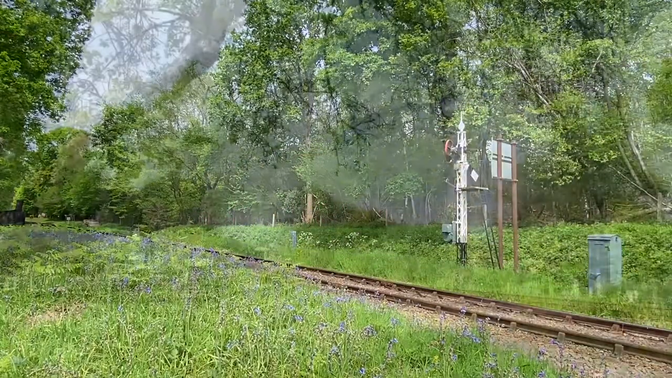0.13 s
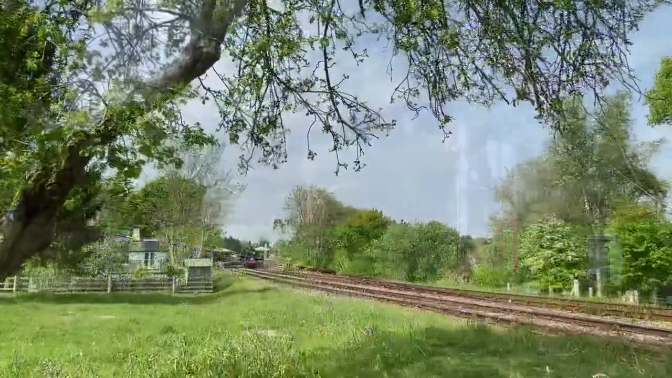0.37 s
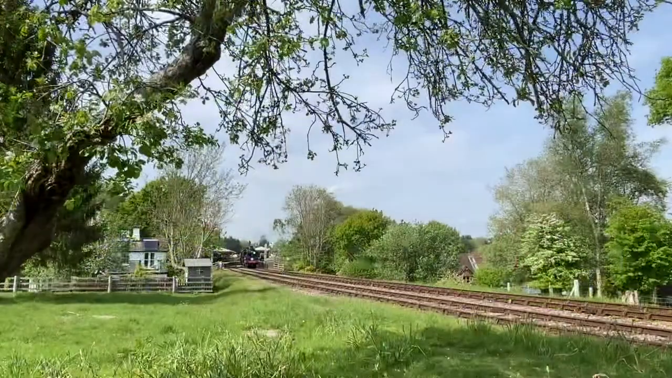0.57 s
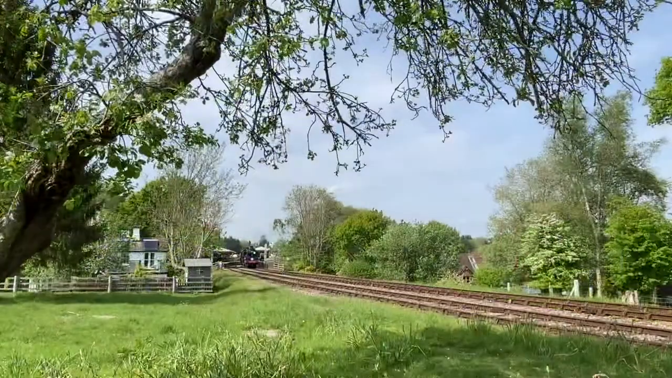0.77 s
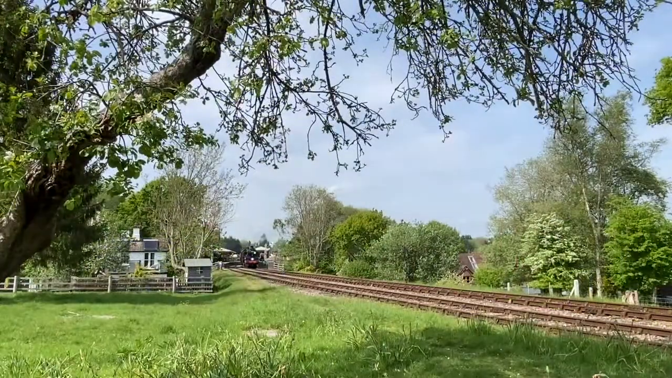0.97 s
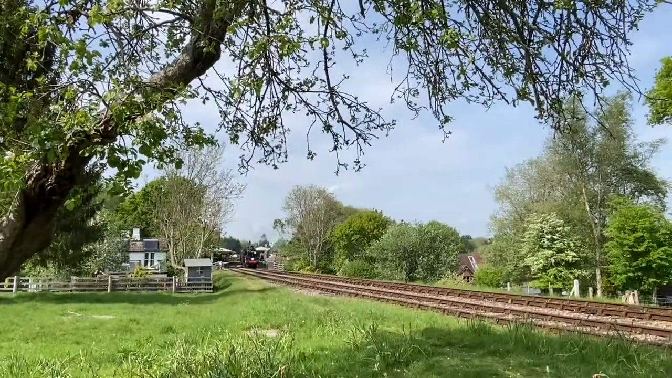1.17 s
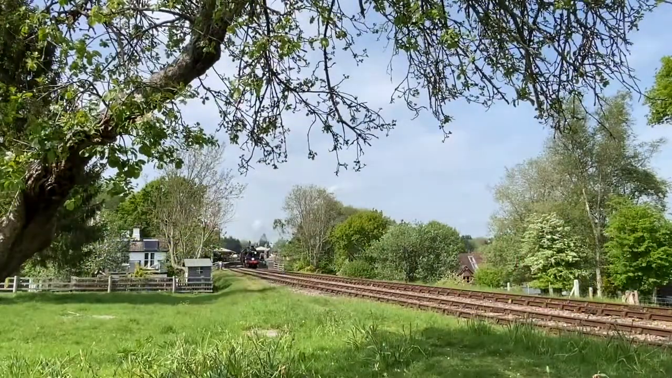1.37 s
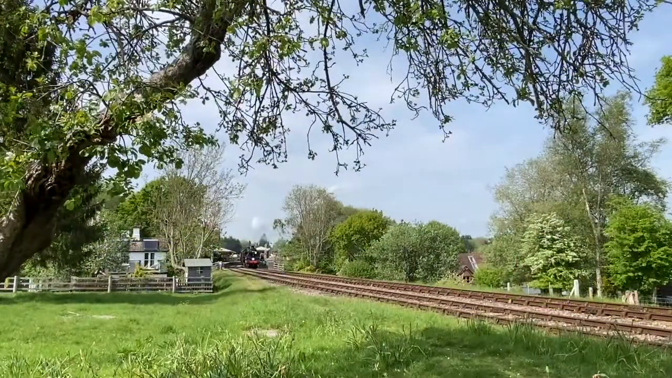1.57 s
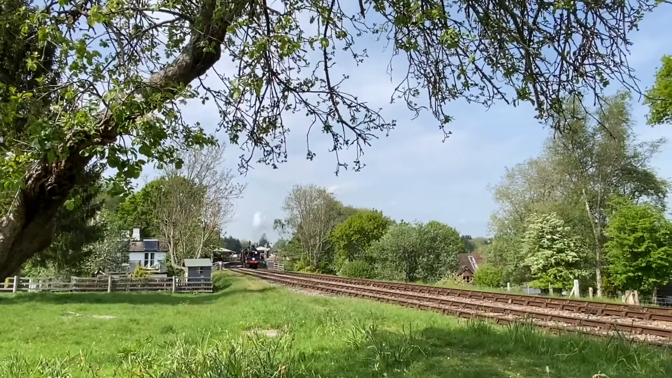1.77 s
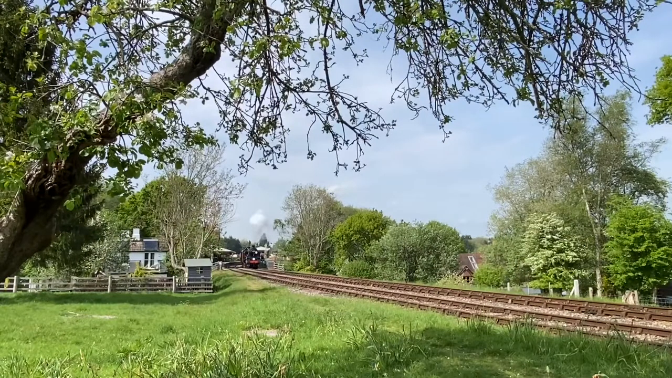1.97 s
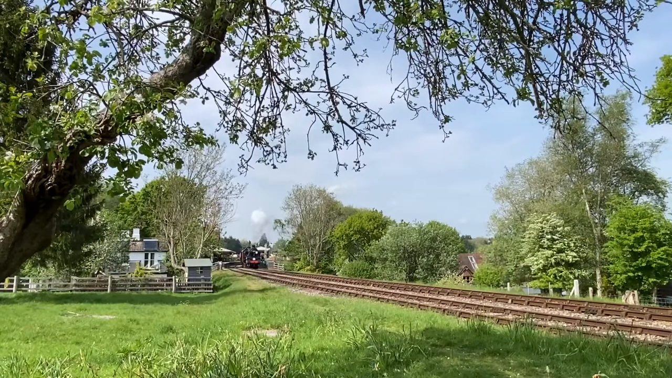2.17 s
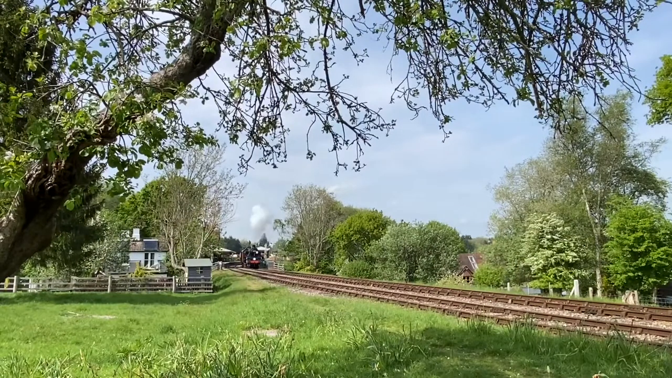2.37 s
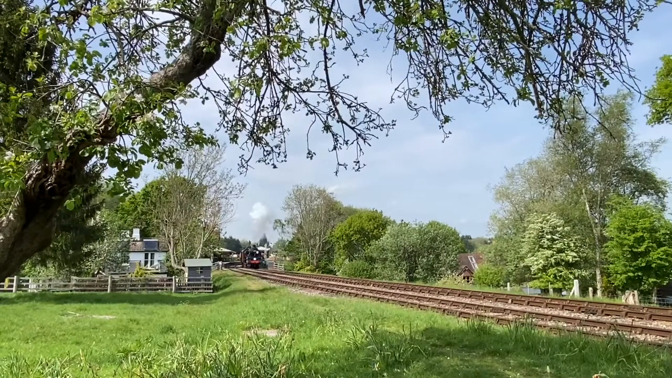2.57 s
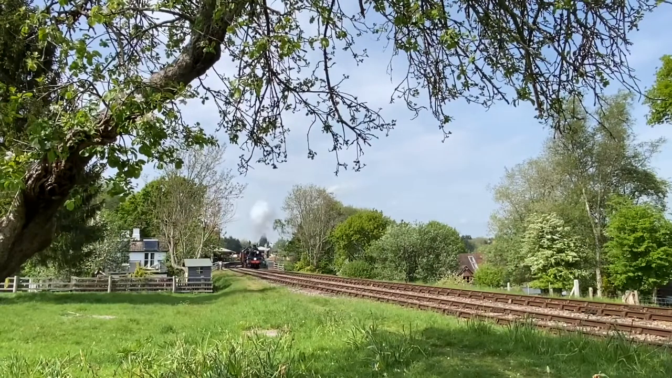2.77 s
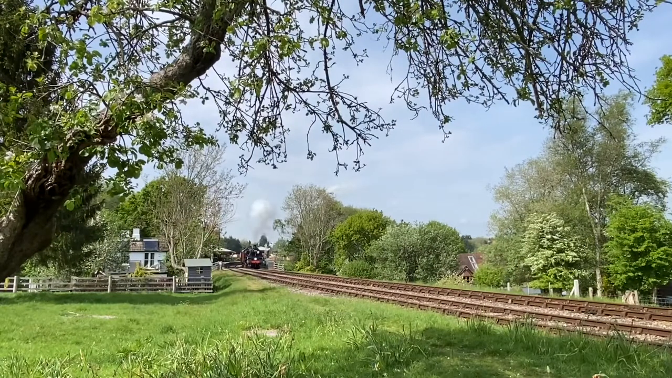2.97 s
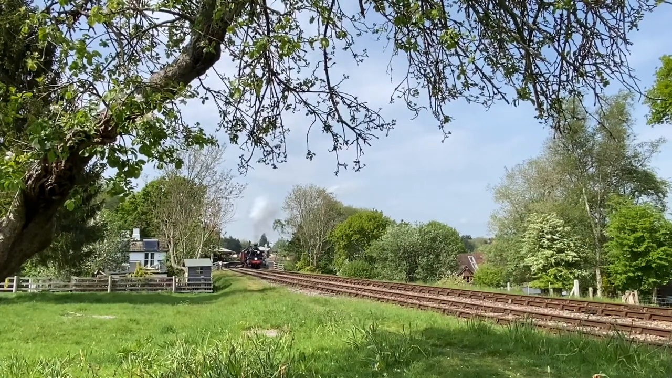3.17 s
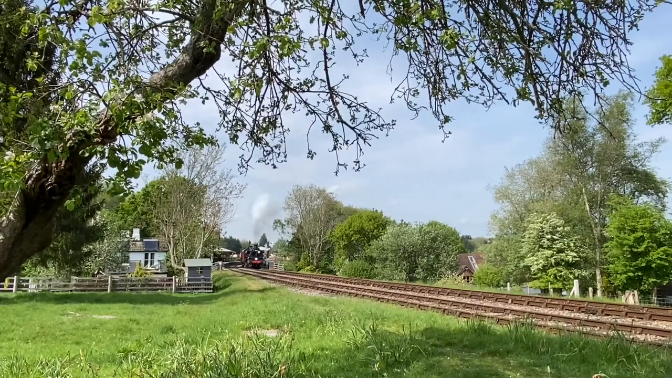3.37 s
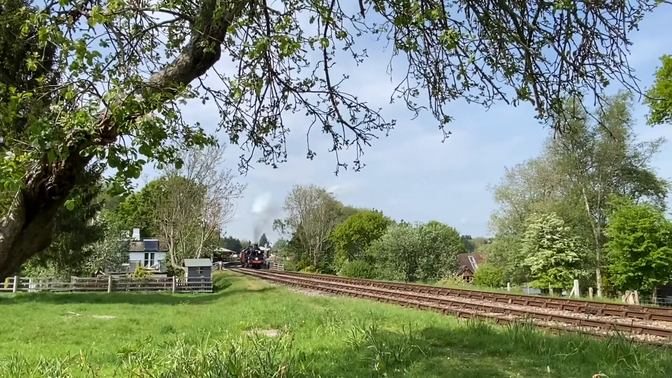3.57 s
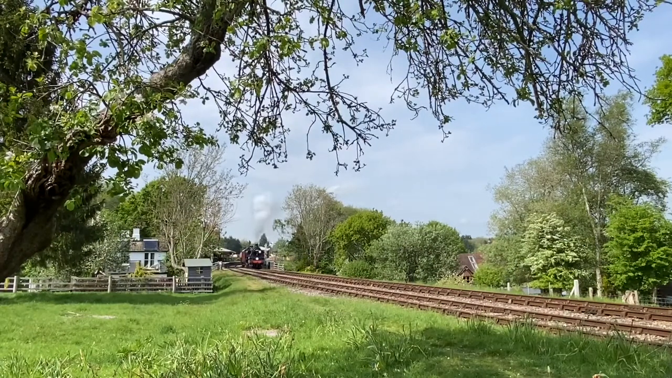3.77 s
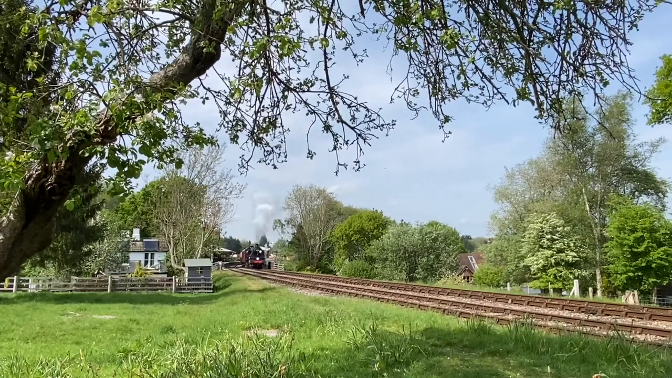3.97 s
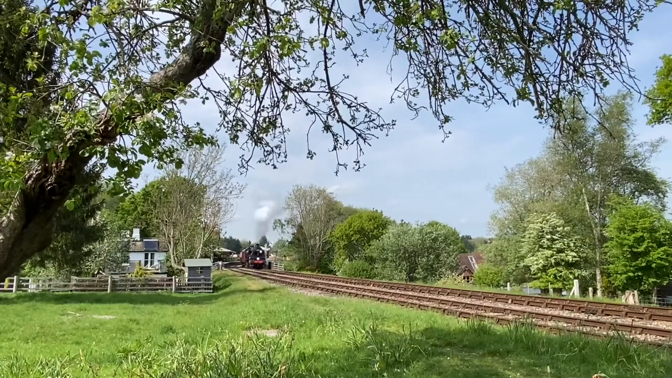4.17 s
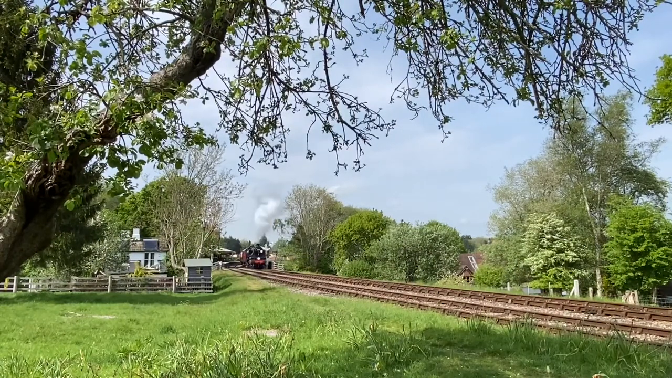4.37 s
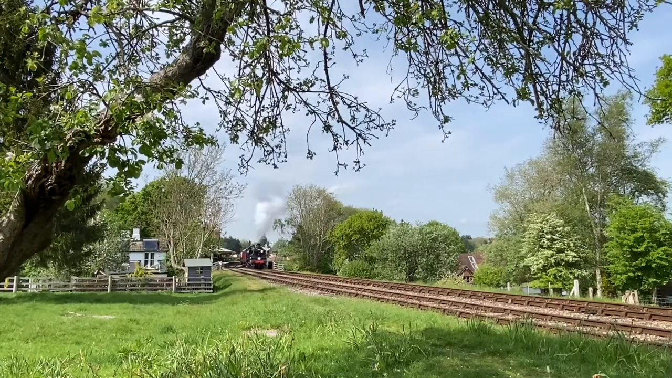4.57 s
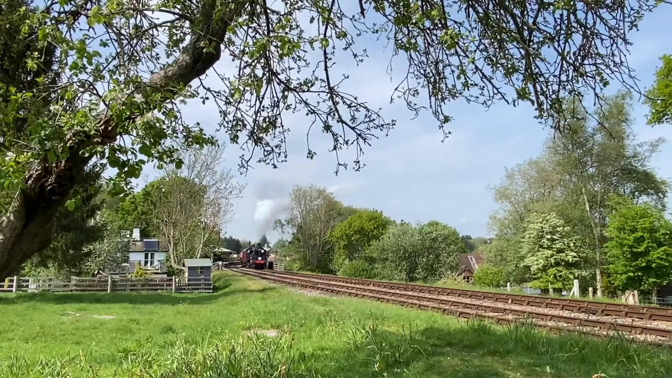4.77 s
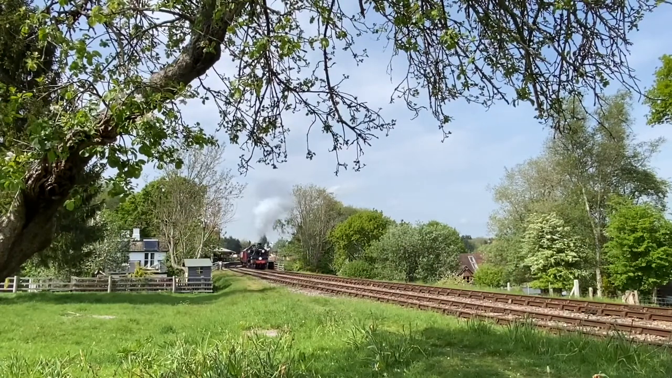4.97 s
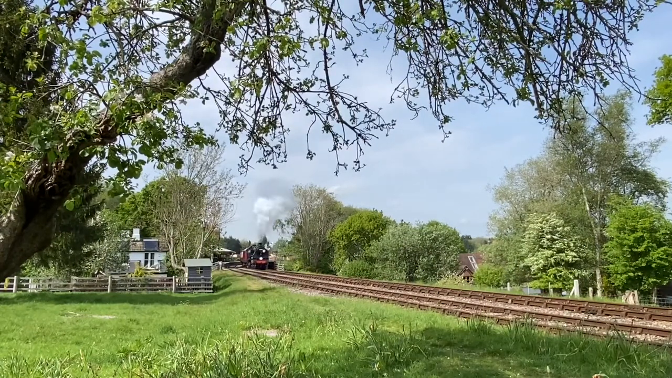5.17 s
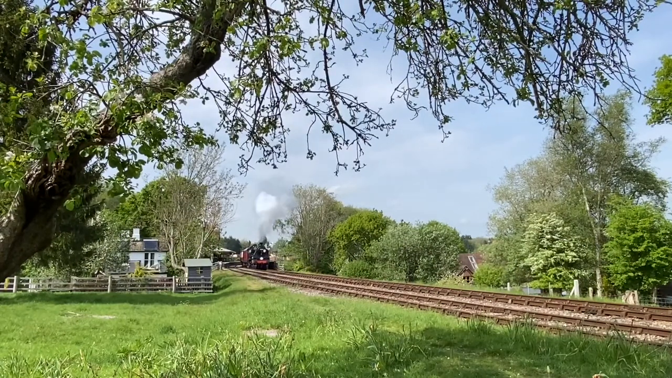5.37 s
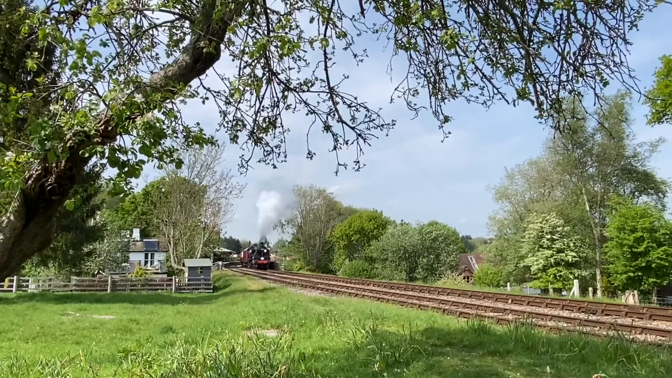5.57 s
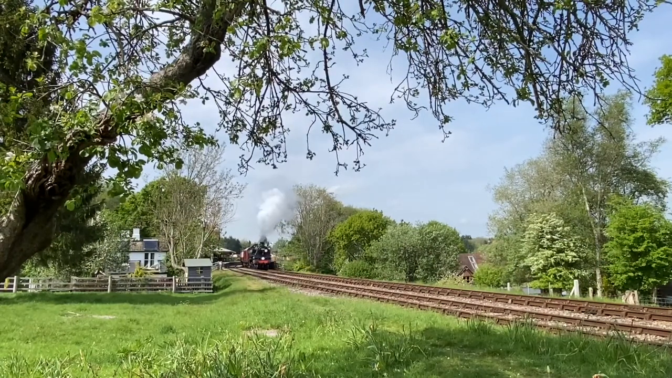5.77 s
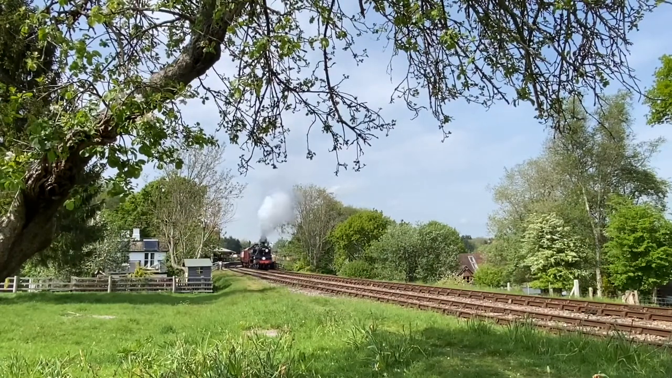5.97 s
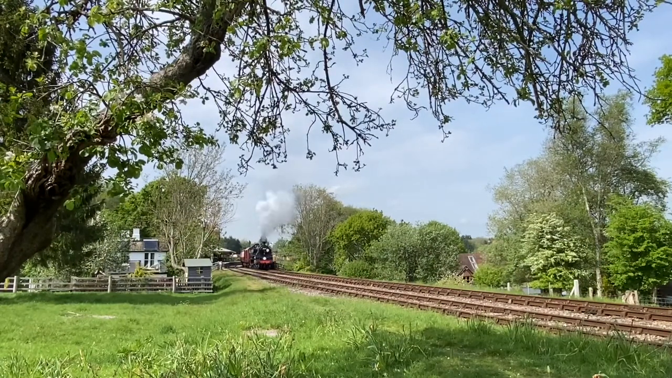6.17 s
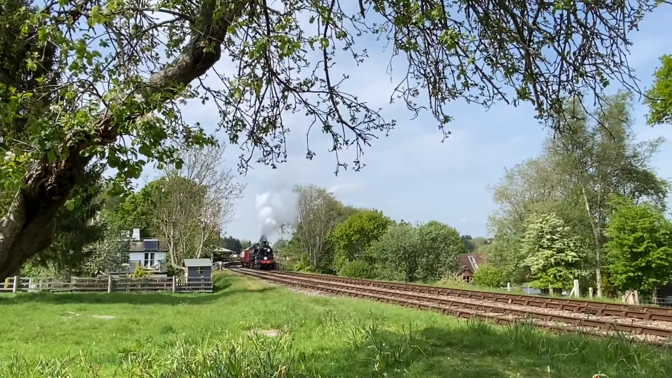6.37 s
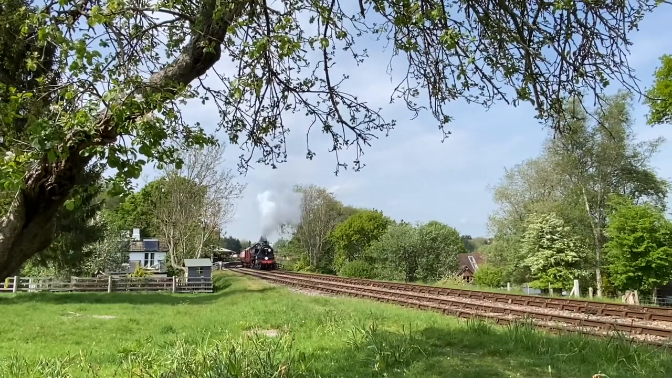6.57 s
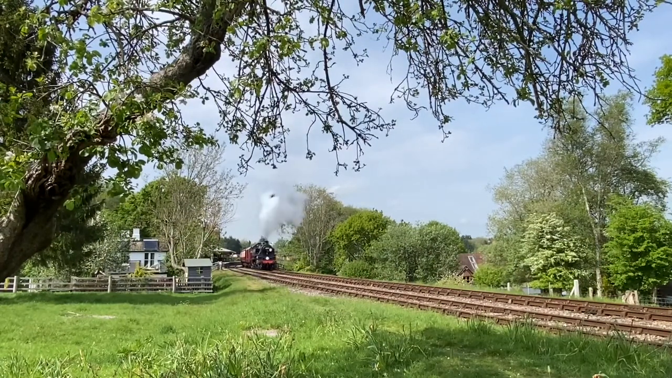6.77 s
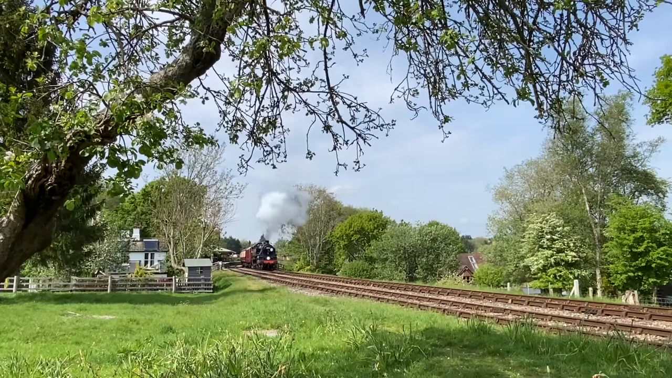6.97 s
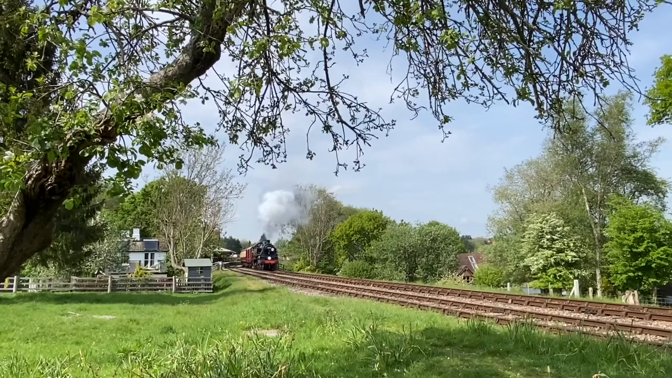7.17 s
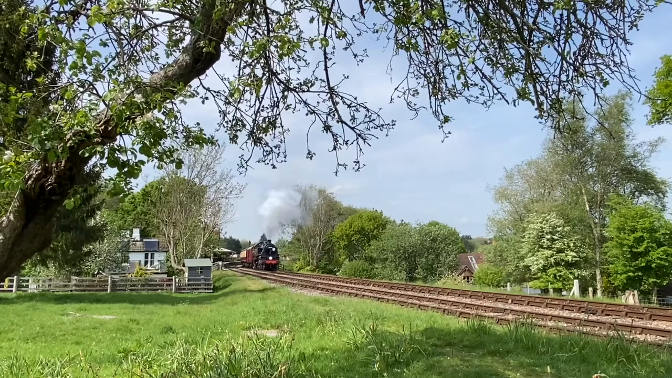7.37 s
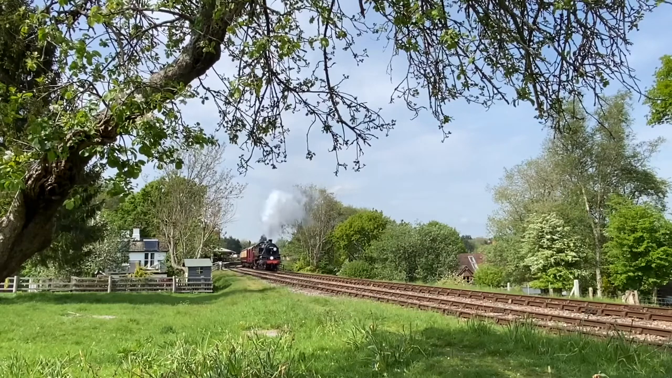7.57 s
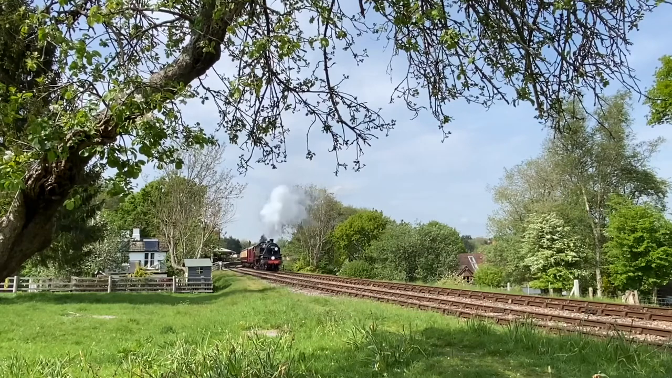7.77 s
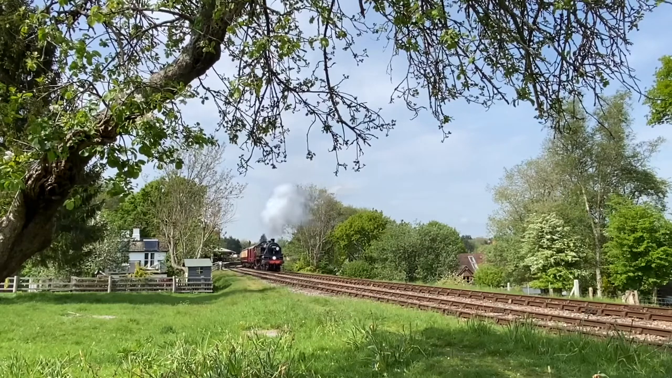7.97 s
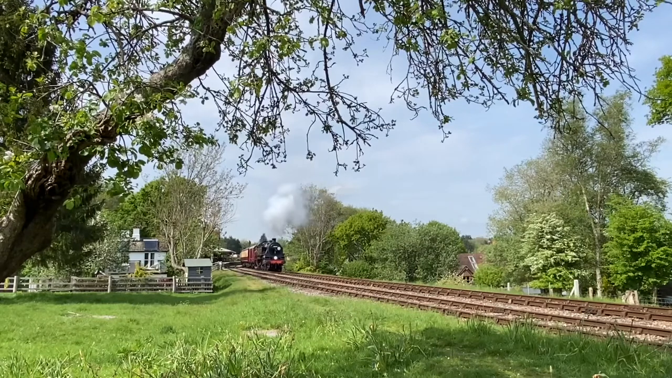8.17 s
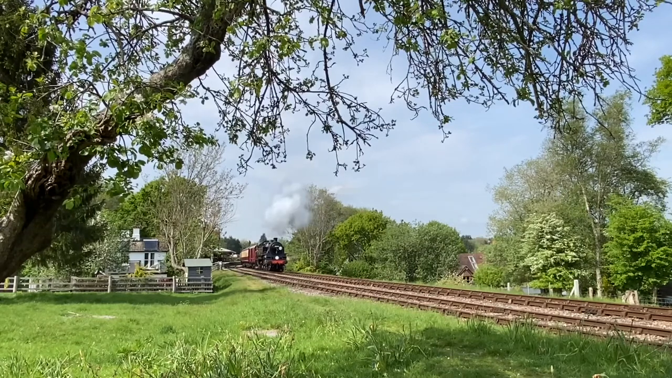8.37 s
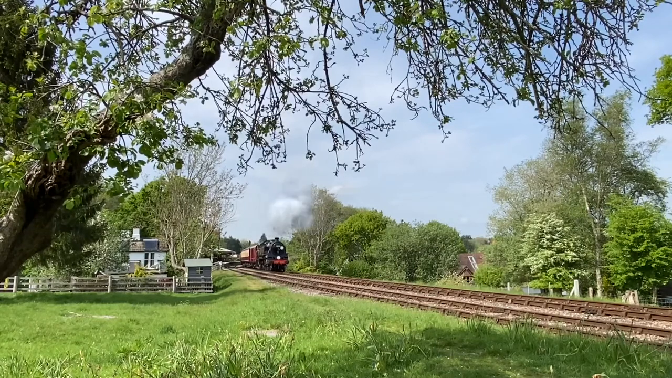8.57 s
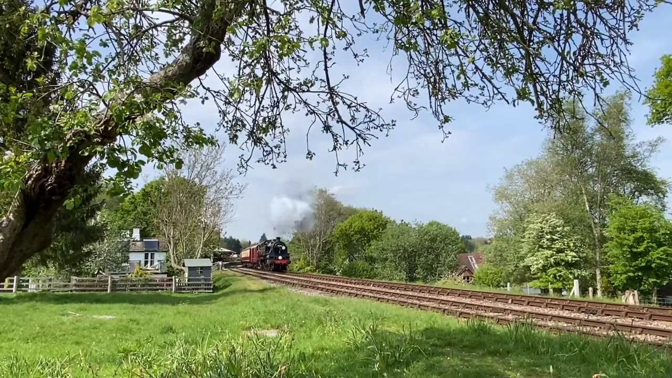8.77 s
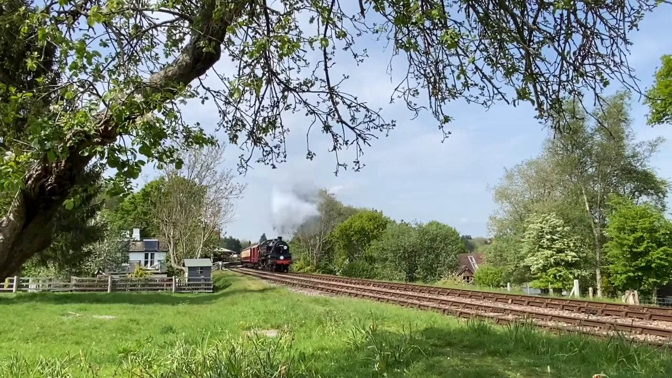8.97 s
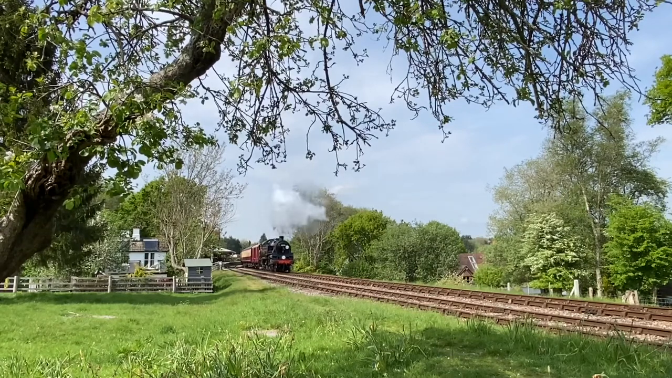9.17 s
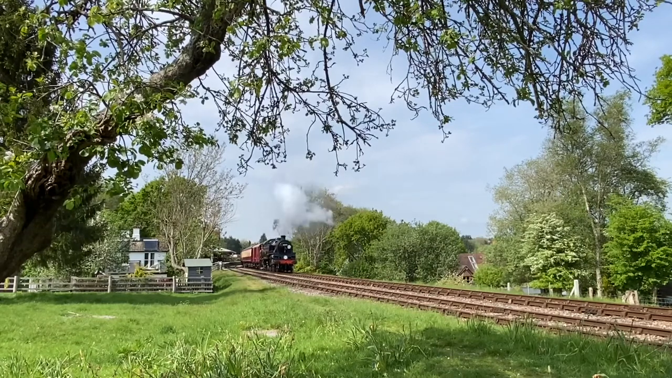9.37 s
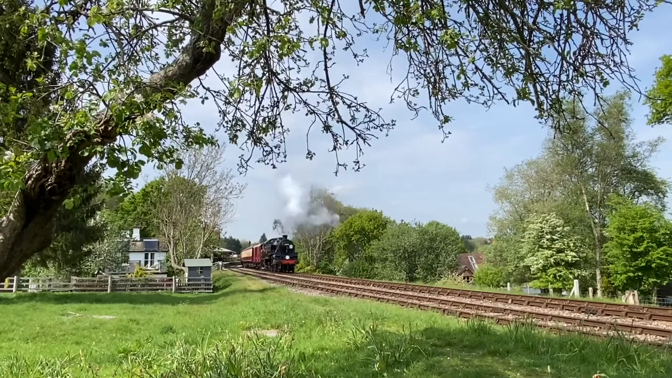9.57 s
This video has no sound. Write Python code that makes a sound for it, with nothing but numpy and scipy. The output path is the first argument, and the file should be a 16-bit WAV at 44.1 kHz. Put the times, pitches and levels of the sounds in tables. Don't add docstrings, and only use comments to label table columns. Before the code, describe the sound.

A distant steam locomotive comes into hearing across open fields, its chuffs quickening and swelling, then softening as steam hisses and a leaking joint whistles.

```python
import sys
import numpy as np
from scipy import signal
from scipy.fft import irfft, next_fast_len
from scipy.io import wavfile
from scipy.ndimage import uniform_filter1d

SR = 44100
rng = np.random.default_rng(int(sys.argv[2]) if len(sys.argv) > 2 else 0)


def to_wav(s):
    ch = np.atleast_2d(s).T
    pcm = np.round(np.clip(ch, -1, 1) * 32767)
    wavfile.write(sys.argv[1], SR, pcm.astype(np.int16))


def amplitude_ratio(level_db):
    exponent = np.asarray(level_db, float) / 20
    return 10 ** exponent


N = 424276
SIZE = next_fast_len(N)
HZ, T = np.fft.rfftfreq(SIZE, 1 / SR), np.arange(N) / SR

# t/s, bark level/dB, smokebox boom level/dB, bark centre f/Hz
BEATS = [(1.062, -68, -93, 1090), (1.505, -55.5, -87, 1170), (1.914, -44.5, -76.9, 1140),
         (2.321, -36.5, -56, 1090), (2.69, -25.5, -46, 1180), (3.041, -25, -40, 1110),
         (3.389, -22.5, -34, 1100), (3.731, -22, -33.5, 1000), (4.053, -20, -28.5, 1050),
         (4.362, -20.5, -29.5, 1065), (4.662, -19, -27.5, 1260), (4.966, -18, -29.5, 1140),
         (5.257, -18.5, -27, 1100), (5.531, -21, -30.5, 1050), (5.801, -20.5, -27, 1130),
         (6.079, -18, -28, 1070), (6.344, -16.5, -28, 1160), (6.592, -17.5, -25, 1115),
         (6.845, -17, -23.5, 1095), (7.099, -17, -23.5, 1100), (7.344, -19, -25.5, 1050),
         (7.582, -22.5, -24, 1020), (7.816, -26, -25.5, 970), (8.052, -26, -28.5, 1040),
         (8.29, -27.5, -30, 1024), (8.517, -29.5, -31, 1120), (8.745, -30.5, -31, 990),
         (8.974, -32.5, -34, 1020), (9.211, -36, -29.5, 970), (9.436, -36, -31.5, 1010)]
# delay/s, rise/s, hold/s, fall/(dB/s)
PUFFS = [
    (-.035, 0.076, 0.01, 260),
    (-.035, 0.066, 0.042, 125),
    (-.035, .06, .05, 214),
    (-.035, 0.073, 0.016, 194),
]
# delay/s, rise/s, hold/s, fall/(dB/s)
MIST_PUFF = (-.04, .075, .025, 140)
# f/Hz, density/dB
JET = [(280, -2), (470, -11), (600, -1), (680, -7), (800, -2.5), (1050, -1), (1300, -0.5), (1700, 0),
       (2100, -8.5), (3000, -13.5), (4500, -20.5), (6500, -28.5), (10000, -30.5), (15000, -58)]
# f/Hz, width/Hz, level/dB
JET_MODES = [(556, 53, -4.5), (751, 76, 7), (849, 68, 5.5), (1187, 170, -3.5), (1296, 23, -17.5),
             (1595, 100, -1.5), (1985, 34, 6), (2680, 28, 4), (3043, 33, 7.5)]
# f/Hz, width/Hz, level/dB
SMOKEBOX = [(69.4, 35.6, 0)]
# f/Hz, width/Hz, level/dB
CHIMNEY = [(142.6, 105, -4), (188.7, 62, 2.5), (234, 47, -1), (329, 132, -9.5), (410, 65, -11)]
# f/Hz, t60/s
TREES = [(60, 0.99), (250, 1.35), (1000, 0.9), (3000, 1.53), (10000, 0.43)]
# f/Hz, density/dB
LEAK = [(1500, -44), (2200, -5.5), (3000, -3.5), (4700, -3), (5400, 0.5), (6300, -10.5), (10000, -32),
        (15000, -47)]
# f/Hz, width/Hz, level/dB
PIPE = [(2190, 40, -6), (2340, 60, -8), (2520, 40, -4), (2780, 50, 0), (3225, 65, 0), (3640, 100, -11),
        (4600, 80, -11), (4780, 80, -11), (6230, 110, -16)]
# f/Hz, width/Hz, level/dB
WHISTLE = [(3700, 800, -12), (4160, 120, 0), (4285, 100, -3)]
# t/s, level/dB
WHISTLING = [(2.3, -7.5), (2.87, -3), (4.08, -7), (4.44, -6), (4.7, -4), (5.12, 1.5), (5.42, -5), (5.69, 3),
             (6.5, 4.5), (7.01, -2), (7.7, 0.5), (8.3, 7.5), (8.98, 9), (9.32, 1.5), (9.62, 1)]
# f/Hz, density/dB
ROLLING = [(30, -2), (65, 6.5), (100, 10), (150, -19), (250, -48), (400, -48)]
# f/Hz, density/dB
BLOWER = [(150, -35), (330, -9.5), (480, -4.5), (780, 1), (1050, -1), (1400, -3), (2000, -8.5), (2600, -12)]
# f/Hz, width/Hz, level/dB
BLOWER_MODES = [(382, 120, 1.5), (783, 42, 7.5), (868, 32, 7.5), (1340, 120, 2), (1510, 67, 9),
                (1800, 53, 11)]
# full level/dB, full at t/s, climb/(dB/s), drift/(dB/s)
RUMBLE = (-40.5, 4.5, 11.5, 0.55)
# full level/dB, full at t/s, climb/(dB/s), drift/(dB/s)
ROAR = (-41, 3.5, 16, -0.52)
# f/Hz, density/dB
RUSH = [(30, 5), (70, -6), (170, 1), (300, -5.5), (500, -0.5), (800, -8.5), (1300, -12), (2400, -10),
        (3500, -12), (5000, -13.9), (7000, -23), (10000, -24.5), (15000, -37)]
# t/s, peak level/dB
TICKS = [
    (.155, -47),
    (1.026, -64),
    (1.362, -67),
]
# f/Hz, density/dB
AIR = [(30, -6), (200, -7.5), (400, -0.5), (700, -0.5), (1100, -11), (1500, 1.5), (2200, -10),
       (3300, -14.5), (3900, -7.5), (4700, -14), (7500, -17.5), (8200, 3), (11000, -6), (15000, -35)]
# f/Hz, left lead/rad, left-right likeness/1, left minus right level/dB
PORTS = [(100, -.48, .98, -.4), (400, -.3, .9, -3), (600, 1.3, .8, -4), (800, 1.2, .97, -1),
         (1700, .9, .97, -1), (2100, 1.4, .85, -4), (3000, 1.85, .9, 0), (4400, 1.75, .86, 0),
         (5350, 3.0, .9, -.5), (5800, 3.9, .8, -1), (6300, 4.9, .6, -2), (7100, 6.28, .7, 1),
         (8000, 7.7, .7, 0)]
# f/Hz, left lead/rad, likeness/1, left minus right level/dB
RUSH_PORTS = [(100, 1.36, 0.67, -2), (378, -2.5, 1, 0), (920, -3, 0.92, 0.5), (1570, -3, 0.96, -3.5),
              (2820, -7, 0.75, -3), (4140, -8.5, 0.82, -2.5), (5123, -10.5, 0.31, -4),
              (7100, -20, 0.43, -1), (8100, -17.5, 0.86, 0)]
# from f/Hz, from f/Hz when quiet, to f/Hz
NO_MID = [(8330, 8750, 9550), (12350, 12400, 13900)]
# from f/Hz, to f/Hz
NO_SIDE = [(10400, 12000), (14500, 23000)]

IN_VIEW_S = 2.1


def evened(x):
    return x / np.sqrt(np.mean(x ** 2) + 1e-20)


def smoothed(x, size_0, size_1):
    return uniform_filter1d(uniform_filter1d(x, size_0, -2), size_1, -1)


def read(points, hz, order=1):
    columns = np.transpose(points)
    return np.interp(np.log(hz + 1), np.log(columns[0] + 1), columns[order])


def peaks(modes):
    curves = [amplitude_ratio(db) / (1 + (2 * (HZ - hz) / width_hz) ** 2) for hz, width_hz, db in modes]
    return np.sqrt(sum(curve ** 2 for curve in curves))


def between(lo_hz, hi_hz):
    return 1 / np.sqrt((1 + (lo_hz / (HZ + 1)) ** 8) * (1 + (HZ / hi_hz) ** 8))


def pair(ports):
    same = np.clip(read(ports, HZ, order=2), 0, 1)
    lead_rad = read(ports, HZ) + np.pi * np.maximum(HZ - ports[-1][0], 0) / 1950
    shift = amplitude_ratio(read(ports, HZ, order=3) / 2) * np.exp(.5j * lead_rad)
    return shift, same / shift, np.sqrt(1 - same ** 2) / shift


def noise(gain, ports=pair(PORTS)):
    left_shared, right_shared, right_alone = ports
    shared, alone = gain * rng.standard_normal((len(HZ), 4)).view(complex).T
    left = left_shared * shared
    right = right_shared * shared + right_alone * alone
    return evened(irfft(np.array([left, right]), SIZE)[:, :N])


def eddies(depth_db, hz):
    size = int(SR / hz)
    swell = uniform_filter1d(uniform_filter1d(rng.standard_normal(N), size), size)
    return evened(amplitude_ratio(depth_db * evened(swell)))


def steadied(x):
    return x / np.sqrt(uniform_filter1d((x ** 2).mean(0), 3000) + .05)


def puffs(levels_db, delay_s, rise_s, hold_s, fall_db_per_s):
    out, starts_s = np.zeros(N), np.transpose(BEATS)[0]
    for start_s, db, gap_s in zip(starts_s, levels_db, np.gradient(starts_s)):
        quick = (.28 / gap_s) ** 0.59
        t = np.arange(SR // 3) / SR * quick
        opening = np.sin(np.pi / 2 * np.minimum(t / rise_s, 1)) ** 4
        shape = opening * amplitude_ratio(-fall_db_per_s * np.maximum(t - rise_s - hold_s, 0))
        part = out[round((start_s + delay_s / quick) * SR):][:len(t)]
        part += amplitude_ratio(db) * shape[:len(part)]
    return out


def exhaust():
    bark_puff, boom_puff, note_puff, sizzle_puff = PUFFS
    s, bark_db, boom_db, centre_hz = np.transpose(BEATS)
    since_view_s = s - IN_VIEW_S
    jet = amplitude_ratio(read(JET, HZ)) * np.sqrt(1 + peaks(JET_MODES) ** 2)
    tilt_db = 14 * np.log2(centre_hz / 1100)
    seen_db = bark_db - 11 * (s < IN_VIEW_S) + 0.91 * tilt_db
    sizzle_db = seen_db - 5 - 2 * since_view_s
    spray_db = seen_db - 16 + 0.4 * since_view_s
    mist_db = -38 + .38 * bark_db - 1.05 * s + .6 * tilt_db
    note_db = -2.5 + bark_db + 0.5 * (boom_db - bark_db)

    bark = puffs(bark_db - 2.0 - tilt_db, *bark_puff) * steadied(noise(jet * between(430, 1210)))
    bark += puffs(bark_db - 6 + tilt_db, *bark_puff) * steadied(noise(jet * between(1060, 1830)))
    sizzle = puffs(sizzle_db, *sizzle_puff) * noise(jet * between(2300, 2800))
    spray = puffs(spray_db, *sizzle_puff) * noise(jet * between(2980, 8600))
    mist = puffs(mist_db, *MIST_PUFF) * noise(between(7500, 12700) ** 3)
    boom = puffs(boom_db, *boom_puff) * steadied(noise(peaks(SMOKEBOX)))
    note = puffs(note_db, *note_puff) * steadied(noise(peaks(CHIMNEY)))
    return (bark + sizzle + spray + mist) * eddies(0.83, 120) + boom + note


def trees(x):
    signs = rng.choice([-1., 1.], SR)
    taps = signs * (rng.random(SR) < 1500 / SR) * (np.arange(SR) > .03 * SR)
    hz, t, z = signal.stft(taps, SR, nperseg=512)
    decay = amplitude_ratio(-60 * t / read(TREES, hz)[:, None])
    tail = signal.istft(z * decay, SR, nperseg=512)[1]
    tail_unit = tail[None, :SR * 3 // 4] / np.linalg.norm(tail)
    return signal.oaconvolve(x, tail_unit, axes=1)[:, :N]


def leak():
    valve_s, opening_s = 2.07, 0.32
    opened = np.maximum(1 - np.exp((valve_s - T) / opening_s), 0) ** 1.1
    hiss_gain = amplitude_ratio(-48 + 0.6642 * (T - 6.5)) * opened
    whistle_db = np.interp(T, *np.transpose(WHISTLING))
    song_db = 0.5 - 0.28 * whistle_db
    hiss = amplitude_ratio(5.0) * eddies(1.0, 35) * noise(amplitude_ratio(read(LEAK, HZ)))
    song = amplitude_ratio(song_db) * eddies(2.5, 9) * noise(peaks(PIPE))
    whistle = amplitude_ratio(whistle_db) * eddies(0.53, 20.0) * noise(peaks(WHISTLE))
    return hiss_gain * (hiss + song + whistle)


def arriving(full_db, full_s, climb_db_per_s, drift_db_per_s):
    slope_db_per_s = np.where(T < full_s, climb_db_per_s, drift_db_per_s)
    return amplitude_ratio(full_db + slope_db_per_s * (T - full_s)) * np.clip((T - 2.05) / 0.15, 0, 1)


def running():
    rolling = amplitude_ratio(read(ROLLING, HZ)) * between(30, 450)
    blower = amplitude_ratio(read(BLOWER, HZ)) * between(120, 4100) * np.sqrt(1 + peaks(BLOWER_MODES) ** 2)
    rumble = arriving(*RUMBLE) * eddies(4.6, 4.0) * noise(rolling)
    roar = arriving(*ROAR) * eddies(1.4, 30) * noise(blower)
    return rumble + roar


def surroundings():
    rush_gain = amplitude_ratio(-33) * np.maximum(1 - T / 0.52, 0) ** 2
    tick_gain = sum(amplitude_ratio(db - 2500 * abs(T - s)) for s, db in TICKS)
    rush = rush_gain * noise(amplitude_ratio(read(RUSH, HZ)), pair(RUSH_PORTS))
    ticks = tick_gain * noise(between(400, 11000))
    air = amplitude_ratio(-63.5) * noise(amplitude_ratio(read(AIR, HZ)))
    return rush + ticks + air


def scene():
    beats = exhaust()
    return beats + amplitude_ratio(-17) * trees(beats) + leak() + running() + surroundings()


def moving_air(z, hz, t):
    patches, streaks = rng.standard_normal((2,) + z.shape[1:])
    patchy_db = 1.8 * evened(smoothed(patches, 5, 5))
    streaky_db = 1.5 * evened(smoothed(streaks, 2, 30))
    treble_db = np.where(t < 6.05, -5, 1) * np.clip((hz - 6500) / 2500, 0, 1)
    return z * amplitude_ratio(patchy_db + streaky_db + treble_db)


def thinned_stereo(z, hz, t):
    mono_from_s = .42
    mono_hz = np.minimum(1200, 330 * (6.0 - t)) * (t > mono_from_s)
    mid = (z[0] + z[1]) / 2
    side = (z[0] - z[1]) / 2 * (hz >= mono_hz)
    mid_power, side_power = smoothed(abs(np.array([mid, side])) ** 2, 8, 4)
    ratio_db = 10 * np.log10(mid_power / side_power.clip(1e-300) + 1e-20)
    quiet = (t > mono_from_s) & (t < IN_VIEW_S)
    mid_gap = sum((hz > np.where(quiet, calm_hz, lo_hz)) & (hz < hi_hz) for lo_hz, calm_hz, hi_hz in NO_MID)
    side_gap = sum((hz > lo_hz) & (hz < hi_hz) for lo_hz, hi_hz in NO_SIDE)
    mid = mid * (ratio_db > -14.5) * (1 - mid_gap)
    side = side * ((ratio_db < 12) | (hz < 3000)) * (1 - side_gap)
    return np.array([mid + side, mid - side])


def roll_off(x):
    return signal.sosfilt(signal.butter(12, 16350, fs=SR, output="sos"), x)


def record(dry):
    hz, t, z = signal.stft(dry, SR, nperseg=1024)
    hz = hz[:, None]
    z = thinned_stereo(moving_air(z, hz, t), hz, t)
    out = signal.istft(z, SR, nperseg=1024)[1][:, :N]
    out = signal.sosfilt(signal.butter(3, 42, "high", fs=SR, output="sos"), out)
    return roll_off(out)


dry = scene()
out = record(dry)
to_wav(out)
```